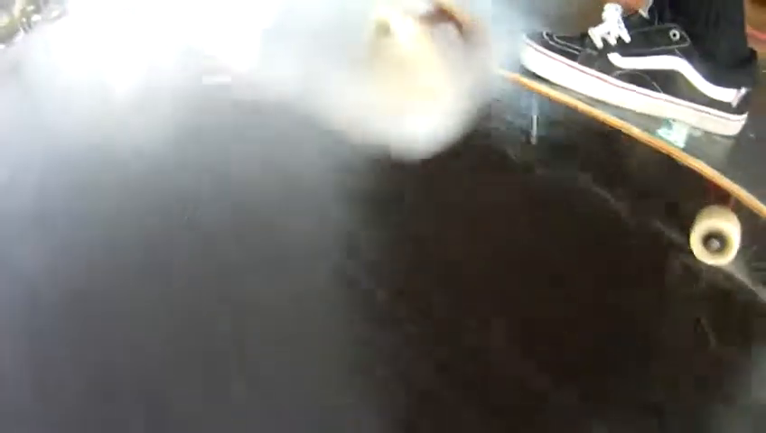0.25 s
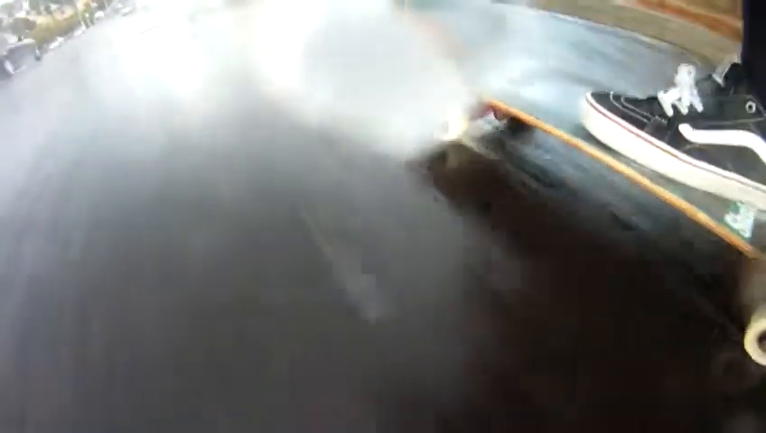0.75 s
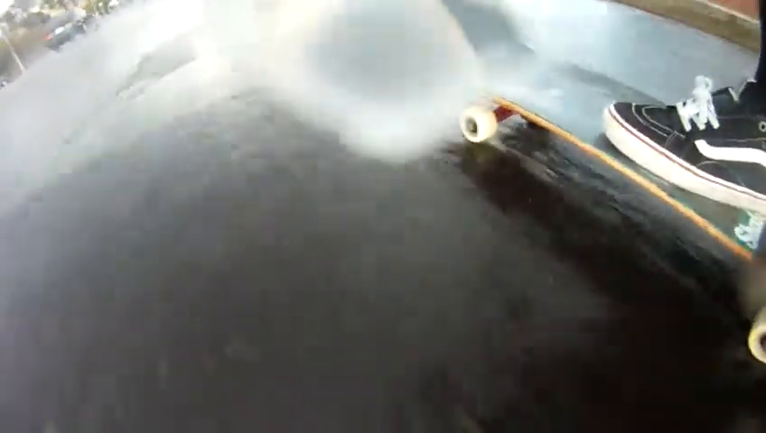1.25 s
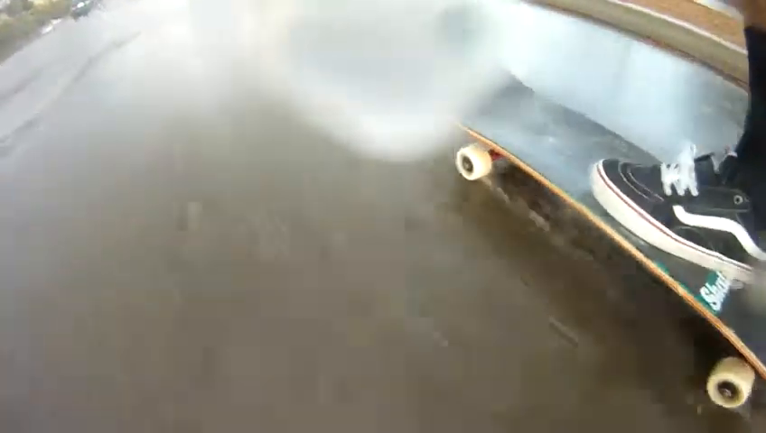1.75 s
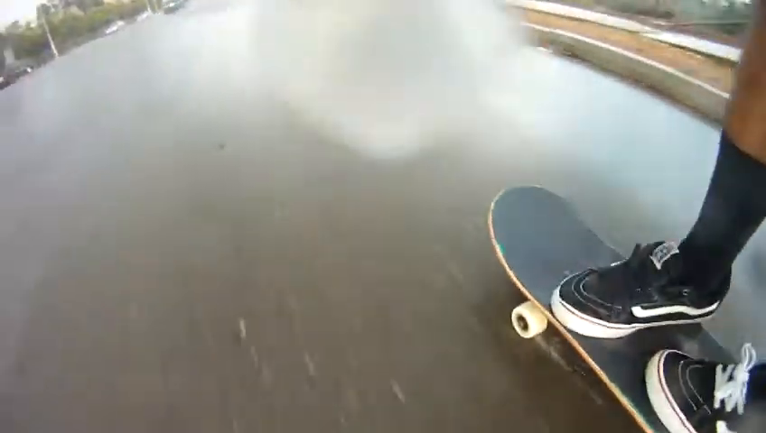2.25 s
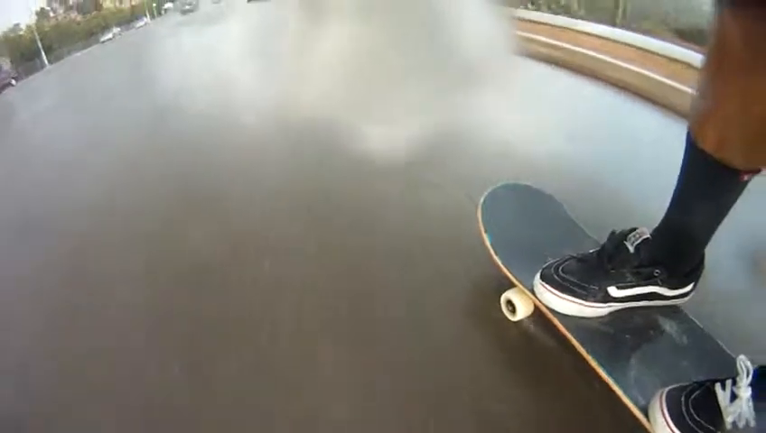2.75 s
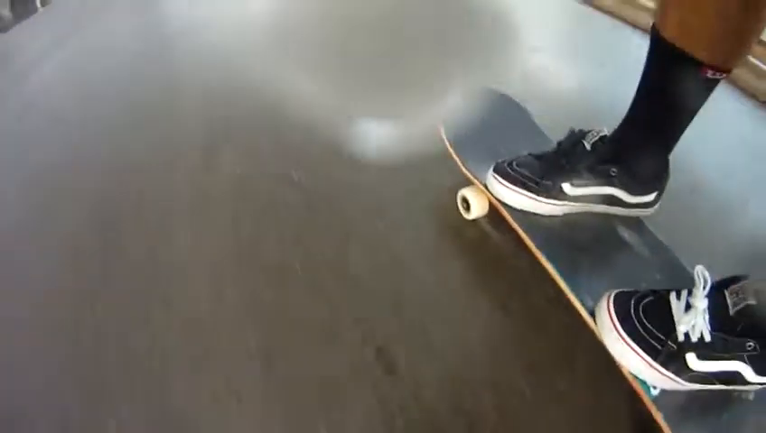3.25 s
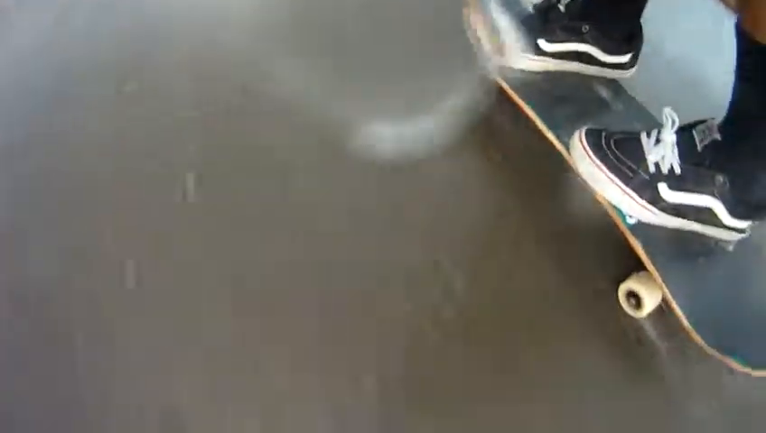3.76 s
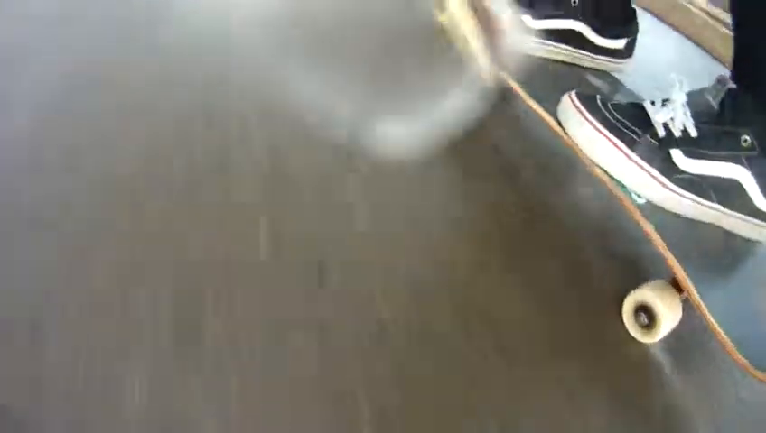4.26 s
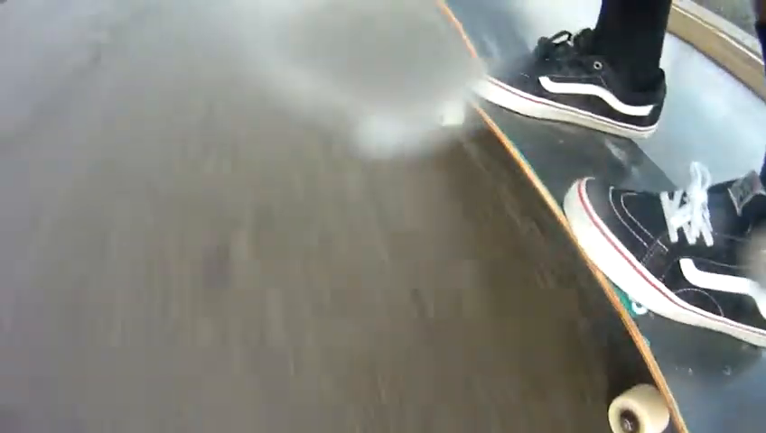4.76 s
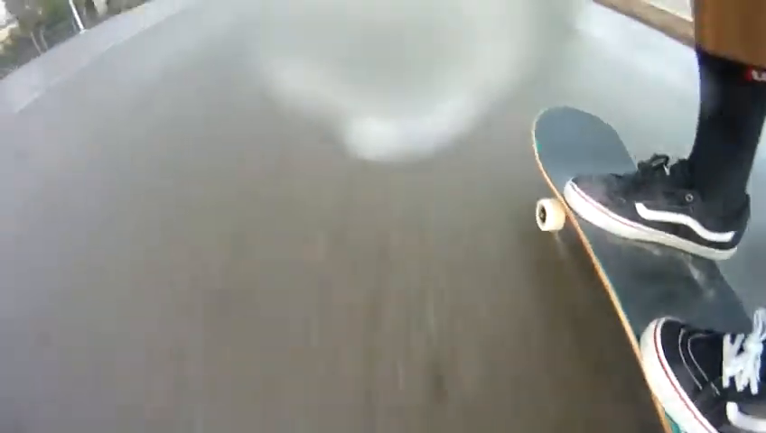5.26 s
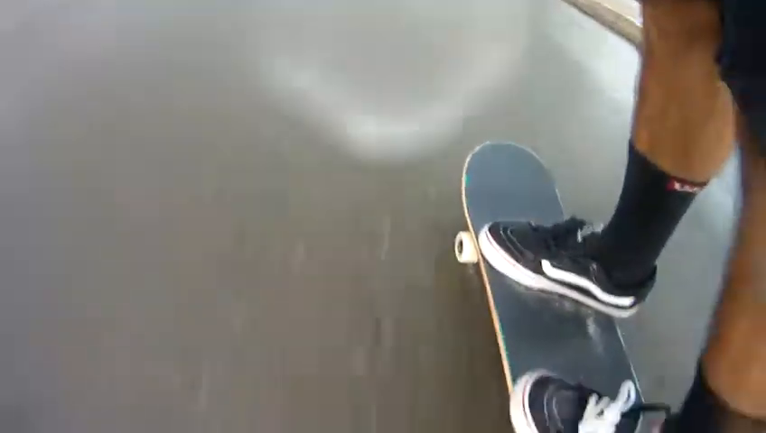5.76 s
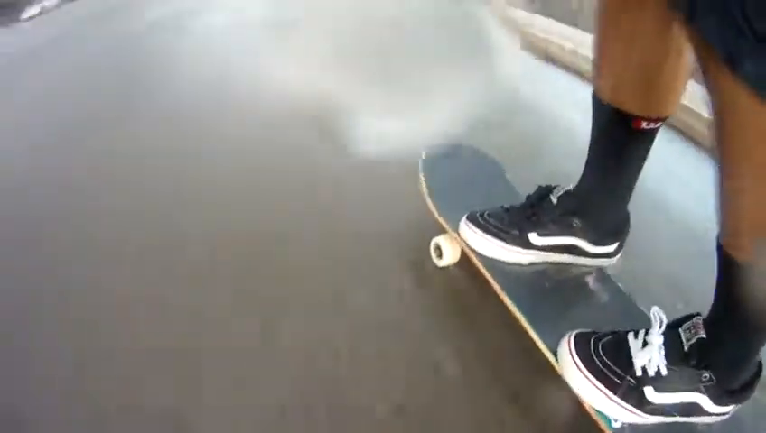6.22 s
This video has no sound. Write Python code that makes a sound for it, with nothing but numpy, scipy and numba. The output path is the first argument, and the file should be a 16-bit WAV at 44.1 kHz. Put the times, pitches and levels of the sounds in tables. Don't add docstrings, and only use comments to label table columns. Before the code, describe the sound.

Wet, gritty skateboard roll heard up close: hissing wheel spray, hollow board drone, wind rumble, and irregular sharp clicks growing denser toward the end.

```python
import sys
import numpy as np
from scipy import signal
from scipy.io import wavfile
from scipy.ndimage import uniform_filter1d
from numba import njit

SR = 44100
rng = np.random.default_rng(int(sys.argv[2]) if len(sys.argv) > 2 else 0)


def linear_from_db(decibels):
    return 10 ** (np.asarray(decibels, float) / 20)


def wav_out(sig):
    wavfile.write(sys.argv[1], SR, np.round(np.clip(np.atleast_2d(sig).T, -1, 1) * 32767).astype(np.int16))


N = 286209


def unit(x):
    return x / np.sqrt(np.mean(x ** 2))


def peak(x):
    return x / np.abs(x).max()


def walk(rate):
    hold = int(SR / rate)
    steps = np.repeat(rng.standard_normal(N // hold + 1), hold)
    smooth = uniform_filter1d(uniform_filter1d(steps, hold), hold)[:N]
    return unit(smooth - uniform_filter1d(smooth, SR // 8))


def ring(x, modes, flicker_db=0):
    out = 0
    for hz, width_hz, db in modes:
        gain = linear_from_db(db + flicker_db * walk(24)) if flicker_db else linear_from_db(db)
        resonance = signal.iirpeak(hz, hz / width_hz, SR)
        once = signal.lfilter(*resonance, x)
        out = out + gain * signal.lfilter(*resonance, once)
    return out


def band(x, low_hz, high_hz):
    return signal.sosfilt(signal.butter(2, [low_hz, high_hz], "band", fs=SR, output="sos"), x)


def curves(table):
    s, *columns = np.transpose(table)
    return [np.interp(np.arange(N) / SR, s, column) for column in columns]


def place(sounds):
    out = np.zeros(N + 4096)
    for s, sound in sounds:
        i = int(s * SR)
        out[i:i + len(sound)] += sound
    return out[:N]


# start_s, wind_level_db, grip_level_db
WIND = [(0.0, -51, -43), (0.07, -39.5, -48), (0.9, -49.5, -53), (1.36, -44.5, -51), (1.77, -49, -65),
        (2.87, -47, -57.5), (3.03, -46, -53), (3.13, -53, -57), (3.98, -45, -59), (4.23, -45.5, -59),
        (4.45, -39, -48), (4.48, -53, -49), (5.01, -47, -52.5), (5.31, -52, -55), (6.16, -36, -62),
        (6.2, -49, -53), (6.45, -34, -69), (6.49, -46, -59)]
# pitch_hz, width_hz, level_db
GUST = [(16, 40, -21), (39.6, 26, 44), (80, 50, -21)]
# pitch_hz, width_hz, level_db
HANDLE = [(106, 114, -3.5), (140.4, 52, -0.5), (185.6, 65, -4.5)]


def wind():
    gust_db, handle_db = curves(WIND)
    gust = unit(ring(rng.standard_normal(N), GUST))
    gust = linear_from_db(gust_db + 0.78 * walk(6)) * gust
    handle = unit(ring(rng.standard_normal(N), HANDLE))
    return gust + linear_from_db(handle_db - 0.5 + 2.8 * walk(9)) * handle


# start_s, peak_db, pitch_hz
THUDS = [
    (2.073, -29, 248),
    (4.334, -21, 300),
    (4.431, -15.5, 284),
    (5.615, -41, 153),
    (5.878, -32, 344),
]


def thuds():
    t = np.arange(4096) / SR
    return place([(s, linear_from_db(db) * np.sin(2 * np.pi * hz * t) * np.exp(-t / 0.0015)) for s, db, hz in THUDS])


# pitch_hz, width_hz, level_db
KNOCK = [(770, 520, -2.5), (1154, 550, 8)]
# pitch_hz, width_hz, level_db
SNAP = [(2830, 1880, -1), (3610, 310, 1.5), (4170, 290, -20)]


def strike(peak_db, knock_db, snap_db, rattle_ms):
    t = np.arange(4096) / SR
    build_up = 1 - np.exp(-t / 0.00014)
    rattle = np.exp(-(t / (rattle_ms / 1000)) ** 5) * build_up
    shake = 2.0 * rng.standard_normal(len(t)) * rattle
    shake[0] += 0.5
    crack_hz = min(1620 + 256 * rattle_ms, 2122)
    waver = np.cumsum(rng.standard_normal(len(t))) * 0.075
    crack = rattle * np.sin(2 * np.pi * crack_hz * t + waver)
    crack = band(band(crack, 1440, 6300), 900, 5600)
    knock = ring(shake, KNOCK)
    snap = band(band(ring(shake, SNAP), 1450, 3670), 1200, 3740)
    fizz = ring(shake, [(4830, 1200, 0)])
    hit = peak(crack) + linear_from_db(knock_db) * peak(knock) + linear_from_db(snap_db + 10.0) * peak(snap)
    hit = hit + linear_from_db(3 + 1.6 * snap_db) * peak(fizz)
    return linear_from_db(peak_db - 1.74) * (hit + 0.24 * ring(hit, SHELL))


# start_s, peak_db
SPLATS = [
    (0.2604, -35),
    (1.3754, -25),
    (2.1905, -35),
    (2.9923, -28.5),
    (4.478, -29),
    (4.8939, -25),
    (4.969, -29),
    (5.4789, -31),
    (5.6934, -27),
]


def splats():
    return place([(s, strike(db, knock_db=-34, snap_db=-2.5, rattle_ms=0.71)) for s, db in SPLATS])


# start_s, peak_db, knock_db
CHIPS = [(0.5348, -17.5, -18), (0.584, -31, -21), (0.6574, -19.5, -9), (0.7238, -20, 0), (0.836, -24.5, 8),
         (0.978, -20, -19), (1.085, -23, 5.5), (1.414, -25, -10), (1.4306, -18.5, -8), (2.574, -20.5, -4),
         (2.9458, -21, -6), (3.3282, -31, 14), (3.4701, -22.5, 2), (3.847, -25.5, 10.5), (4.0995, -22, -15),
         (4.312, -23, 8), (4.5218, -23, -8), (4.624, -22, 2), (4.7163, -33, -2), (4.7953, -18.5, 4),
         (4.9844, -17, -9), (5.0915, -14, -16), (5.3079, -18.5, 2), (5.3701, -10, -16), (5.5124, -33, 11),
         (5.9514, -19.5, -7), (6.143, -20, -2), (6.211, -18.5, -6), (6.247, -22, 0), (6.3226, -21, -7)]


def chips():
    return place([(s, strike(db, knock_db, snap_db=-14.5, rattle_ms=2.04)) for s, db, knock_db in CHIPS])


# start_s, peak_db, knock_db, snap_db, rattle_ms
STONES = [(0.275, -19.5, 6, -8, 3.4), (1.161, -35, 18.5, -12, 4.8), (1.2361, -29, 11.5, -7, 5.6),
          (1.3595, -3.5, -10, -20, 2.8), (1.485, -26, 14, -8, 8.5), (1.583, -14, 7, -10, 2.6),
          (2.0736, -5, -6, -17.5, 0.65), (2.627, -29, 1, -1, 0.38), (2.8383, -11.5, -10, -11.5, 0.97),
          (2.9589, -15.5, -3, -11.5, 0.71), (3.2616, -14.5, 6, -14, 1.5), (3.3723, -21, 4, -22.5, 0.91),
          (4.3347, -21.5, 13.5, -20, 3), (4.4019, -4, -11, -25, 0.96), (4.4316, -13, 5.5, -17, 2.5),
          (4.5281, -11.5, -22, -2.5, 0.97), (4.5362, -16, -18, -12.5, 4.9), (4.665, -15.5, 3, -6, 2.1),
          (4.7338, -19, 4.5, -8.5, 5.3), (4.8453, -15.5, 3, -6, 2.5), (5.1202, -20.5, 5.5, -21, 9.2),
          (5.5382, -7.5, -22, -17, 0.97), (5.6152, 7.5, -6, -11.5, 4.2), (5.9158, -23.5, 9.5, -10.5, 7.3)]


def stones():
    return place([(s, strike(*hit)) for s, *hit in STONES])


# pitch_hz, width_hz, depth (0 to 1)
CASE_GAPS = [(977, 64, 0.78), (1321, 150, 1), (1806, 320, 0.52), (4200, 680, 0.6)]


def case(x):
    for hz, width_hz, depth in CASE_GAPS:
        x = x - depth * signal.lfilter(*signal.iirpeak(hz, hz / width_hz, SR), x)
    return x


# start_s, peak_db, pitch_hz
JOLTS = [(0.916, -20, 694), (3.138, -18, 720), (2.471, -17.5, 735), (2.86, -17, 721), (2.951, -22, 650),
         (3.05, -19, 704), (3.327, -15.5, 755), (3.372, -16, 750), (3.613, -19, 824), (3.943, -21.5, 720),
         (4.43, -26, 726), (4.603, -16.5, 653), (4.676, -16, 546), (4.714, -17, 743), (4.778, -19, 845),
         (5.044, -20, 770), (5.119, -18.5, 616), (5.216, -20, 720), (5.31, -17, 810), (5.393, -15, 800),
         (5.493, -20, 715), (5.652, -16, 710), (5.708, -23, 740), (5.843, -15.5, 860), (5.877, -10.5, 780),
         (6.015, -15, 760), (6.083, -16, 770), (6.137, -29, 720), (6.264, -15, 830), (6.442, -17, 714)]


def jolts():
    t = np.arange(2048) / SR
    swell = peak(t * np.exp(-t / 0.0019))
    sounds = []
    for s, db, hz in JOLTS:
        waver = np.cumsum(rng.standard_normal(len(t))) * 0.035
        sounds.append((s, linear_from_db(db - 1.0) * swell * np.sin(2 * np.pi * hz * t + waver)))
    return place(sounds)


def grit(rate, spread_db, smooth):
    hit = rng.random(N) < rate / SR
    size_db = spread_db * np.minimum(rng.exponential(size=N), 4)
    grains = hit * rng.standard_normal(N) * linear_from_db(size_db)
    return np.sqrt(1 - smooth) * unit(grains) + np.sqrt(smooth) * rng.standard_normal(N)


# pitch_hz, width_hz, level_db
SPRAY = [(2770, 520, -0.5), (3120, 196, 3.5), (3527, 450, 4.5), (4040, 150, 0)]
# pitch_hz, width_hz, level_db
MIST = [(4656, 205, 4), (5123, 430, 7)]
# pitch_hz, width_hz, level_db
FINE = [(5400, 430, 0), (5905, 340, -1.5)]
# start_s, fineness_db
FINENESS = [
    (0, 0),
    (1.8, 2),
    (2.2, -5),
    (2.85, -7),
    (3.2, -1),
    (4.12, 3),
    (4.7, -1),
    (5.8, -2),
    (6.1, 3),
    (6.49, -8),
]


def spray(road, load, wet, bumps):
    water = 0.35 * road + 1.03 * grit(3000, 4.9, 0.54)
    spray_db = -41.5 + load + wet
    mist_db = -50.5 + 0.74 * load + 0.75 * wet
    fine_db = -50.5 + 0.81 * load + 1.0 * wet + curves(FINENESS)[0]
    coarse_drops = linear_from_db(spray_db + 0.94 + 1.0 * bumps) * unit(ring(water, SPRAY, flicker_db=0.7))
    mist = linear_from_db(mist_db + 5.5 + 0.8 * bumps) * unit(ring(water, MIST))
    fine = linear_from_db(fine_db + 1.0 + 0.69 * bumps) * unit(ring(water, FINE))
    return coarse_drops + mist + fine


# pitch_hz, width_hz, level_db
BELLY = [(267, 69, 0), (359.2, 166, 13.5), (443, 230, -2)]


def belly(load, coarse, bumps):
    belly_db = -43.5 + 0.1 * load - 1.2 * coarse
    rumble = unit(ring(rng.standard_normal(N), BELLY, flicker_db=0.24))
    return linear_from_db(belly_db - 1.2 + 1.0 * bumps) * rumble


# pitch_hz, width_hz, level_db
DECK = [(555.6, 253, 4.5), (695.3, 269, 11), (845, 42, -10)]


def deck(roll_db, coarse, bumps):
    drone = unit(ring(grit(3000, 3.5, 0.81), DECK))
    return linear_from_db(roll_db + coarse - 1.93 + 0.32 * bumps) * drone


# pitch_hz, width_hz, level_db
SHELL = [(1097, 136, 4), (1181.6, 167, 8), (1566, 250, 5), (2075, 297, 2.5), (2390, 50, -10)]


def shell(road, roll_db, bumps):
    return linear_from_db(roll_db - 0.18 + 1.88 * bumps) * unit(ring(road, SHELL, flicker_db=0.6))


# start_s, rolling_load_db, road_coarseness_db, wetness_db
RIDE = [(0.0, -31, -5.5, 1.5), (0.42, -30.5, -5.5, 2.5), (0.96, -29.5, -5.5, -0.5), (1.23, -31, -3.5, -2),
        (1.43, -28, -4.5, -1), (1.84, -35, -2.5, 0), (2.36, -35, 1, -2.5), (2.5, -33, 3.5, -3.5),
        (2.82, -31, 2, -3.5), (3.27, -32.5, 3, -1), (3.56, -30, 2.5, -3.5), (4.08, -33, 1, -0.5),
        (4.55, -29, 2, -0.5), (5.08, -27.5, 0.5, -4.5), (5.36, -24.5, 0.5, -7), (5.66, -28, 3, -7.5),
        (5.85, -27.5, 2, -7.5), (6.49, -26.5, 1, -4)]


def board():
    roll_db, coarse, wet = curves(RIDE)
    load = roll_db + 31
    bumps = 0.3 * walk(35) + 0.88 * walk(80)
    road = grit(3000, 7.0, 0.77)
    rolling = shell(road, roll_db, bumps) + deck(roll_db, coarse, bumps)
    return rolling + belly(load, coarse, bumps) + spray(road, load, wet, bumps)


def scene():
    ticks = thuds() + splats() + chips() + stones()
    return (wind() + ticks + case(jolts() + board()))[None]


@njit
def duck(x, top, release):
    y, level = np.empty(len(x)), 0.
    for i in range(len(x)):
        y[i] = x[i] * min(1., top / (level + 1e-9))
        speed = .006 if abs(x[i]) > level else release
        level += (abs(x[i]) - level) * speed
    return y


def band_limit(x):
    return signal.sosfilt(signal.butter(12, 16130, fs=SR, output="sos"), x)


def record(dry):
    low = signal.resample_poly(duck(dry[0], .15, .0015), 40, 147)
    held = np.repeat(np.clip(low, -.95, .95), 4)
    x = signal.resample_poly(held, 147, 160)[:N]
    x = signal.sosfiltfilt(signal.ellip(8, .1, 14, 15270, fs=SR, output="sos"), x)
    return band_limit(x[None])


dry = scene()
out = record(dry)
wav_out(out)
```